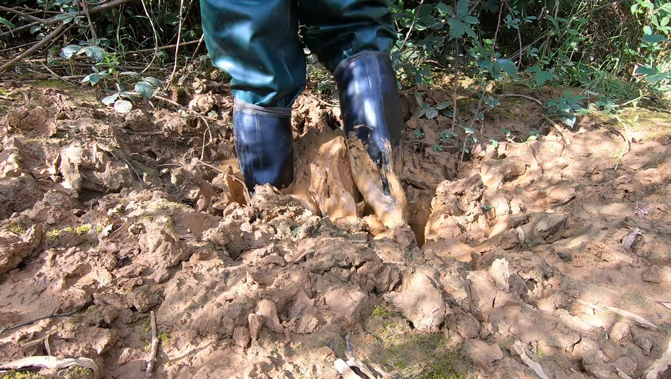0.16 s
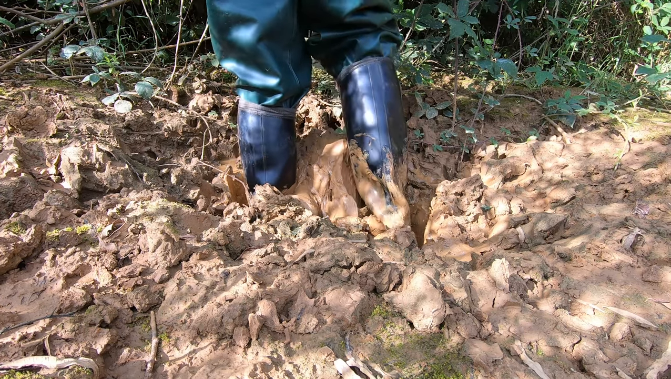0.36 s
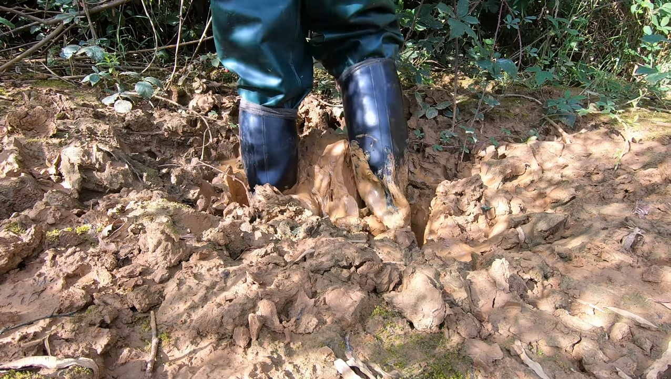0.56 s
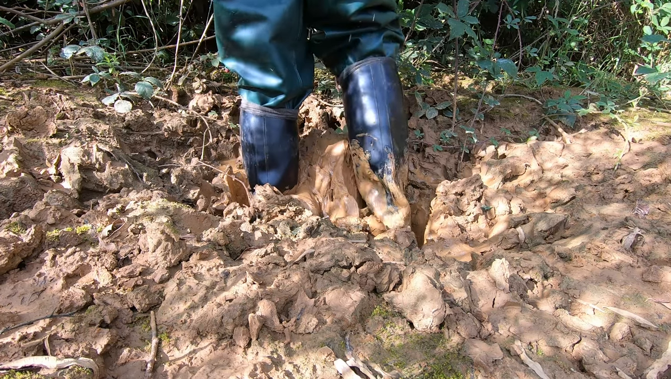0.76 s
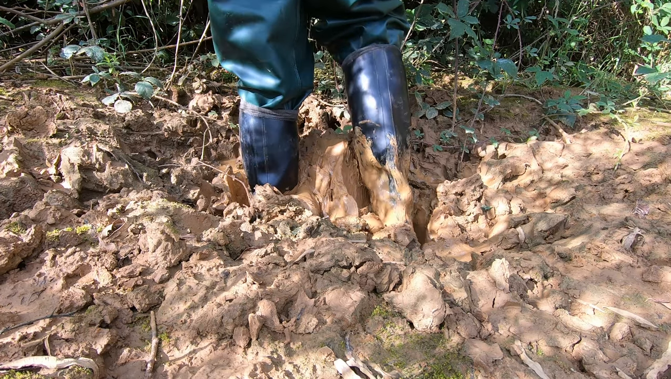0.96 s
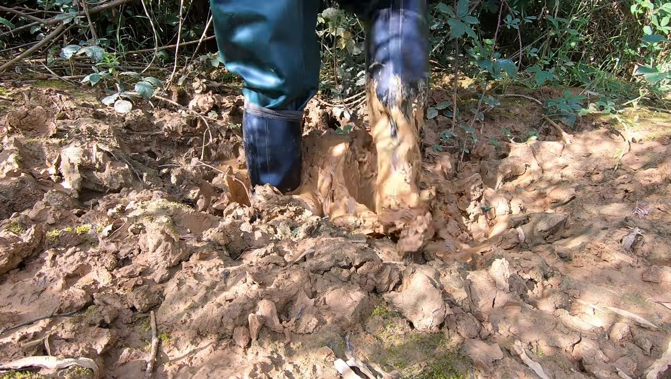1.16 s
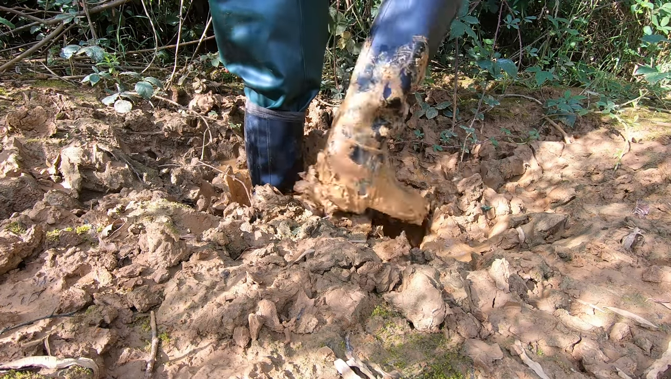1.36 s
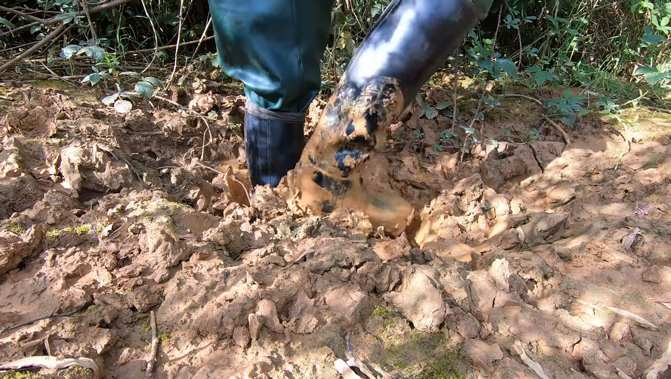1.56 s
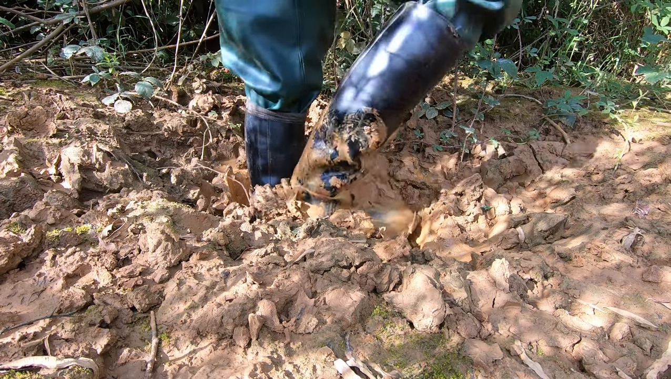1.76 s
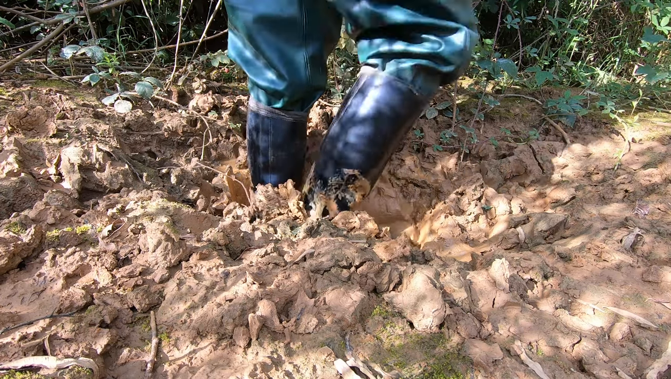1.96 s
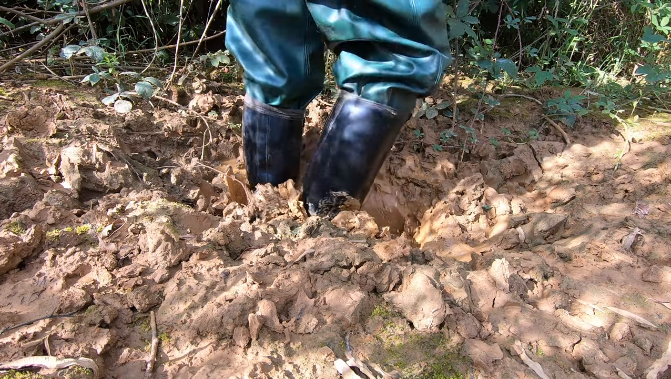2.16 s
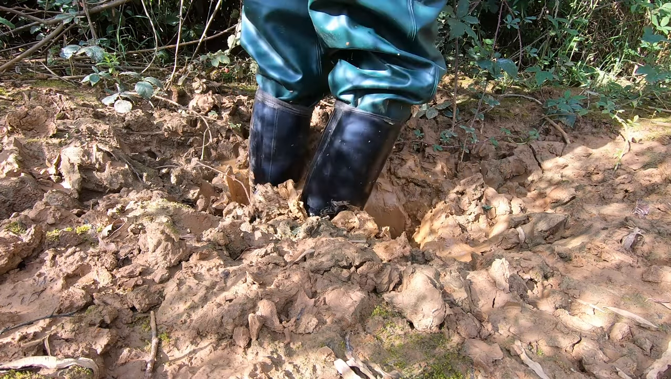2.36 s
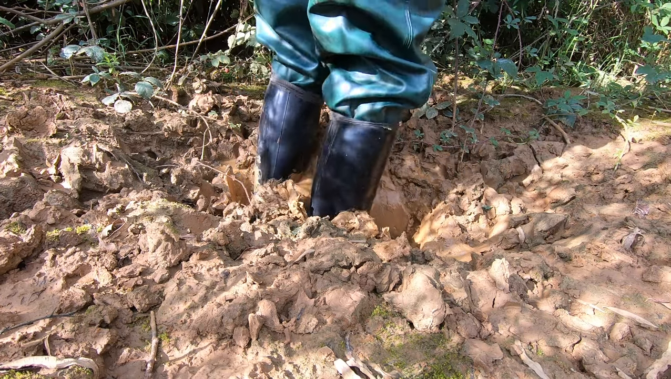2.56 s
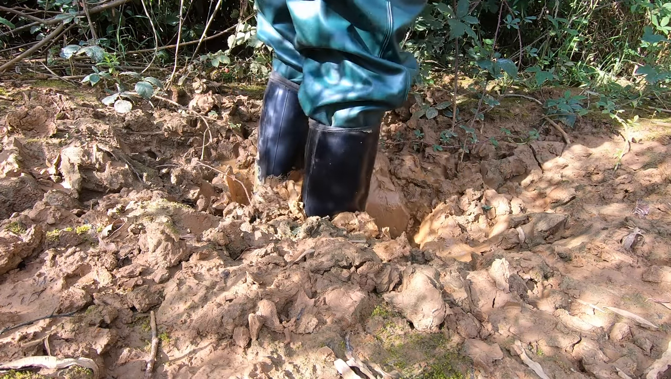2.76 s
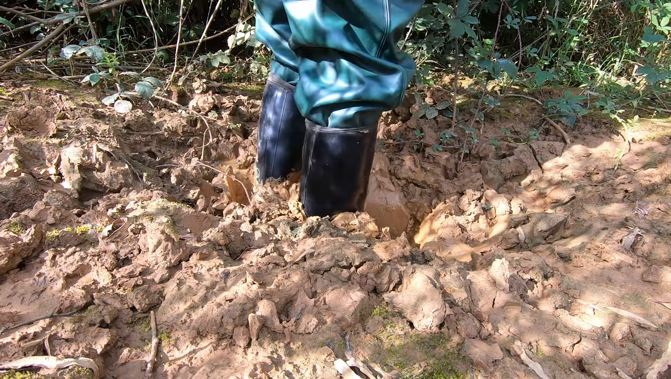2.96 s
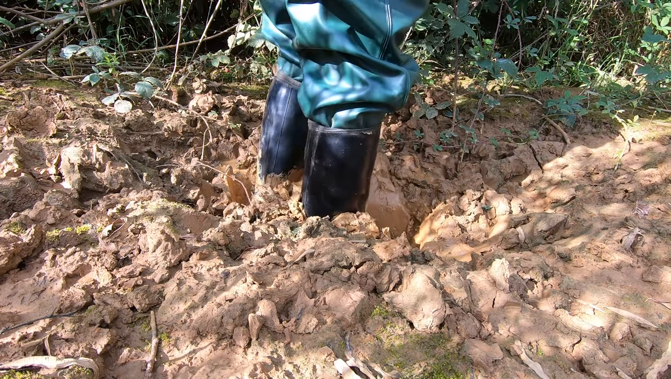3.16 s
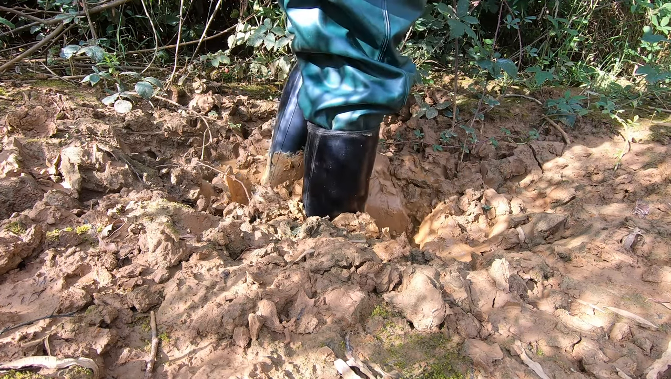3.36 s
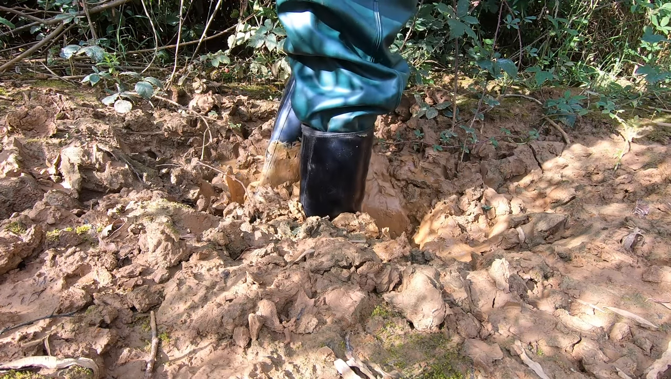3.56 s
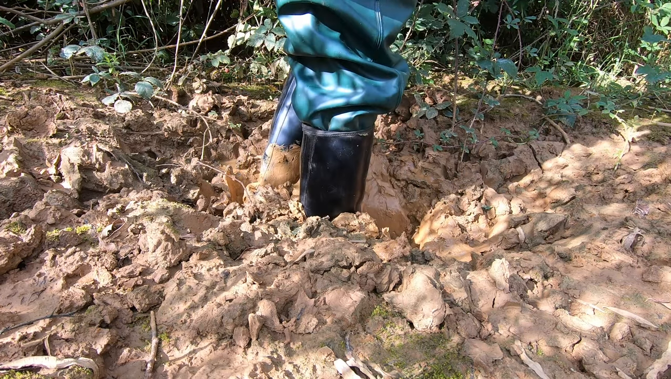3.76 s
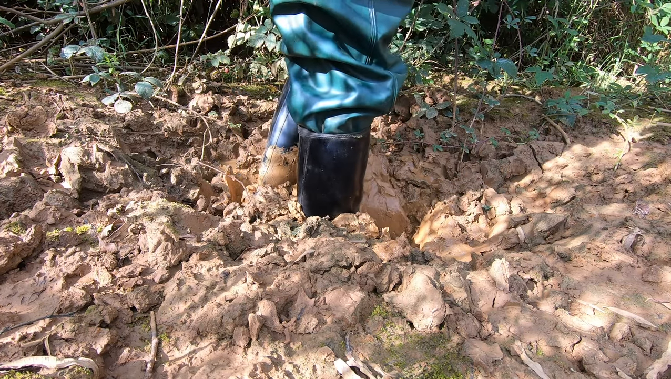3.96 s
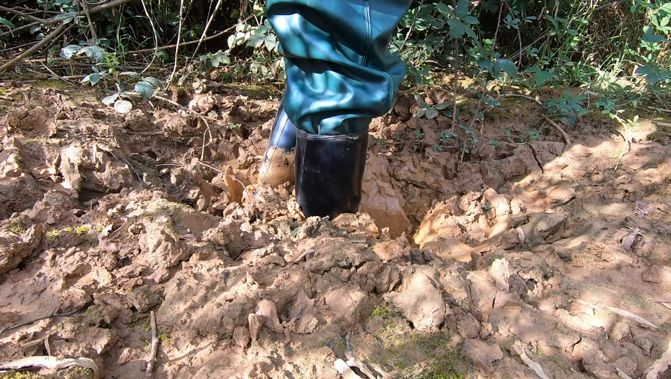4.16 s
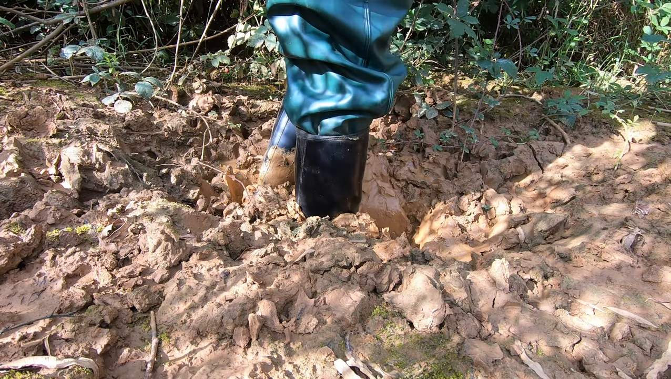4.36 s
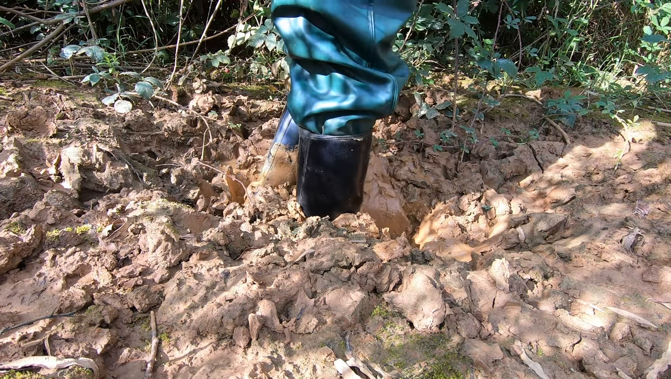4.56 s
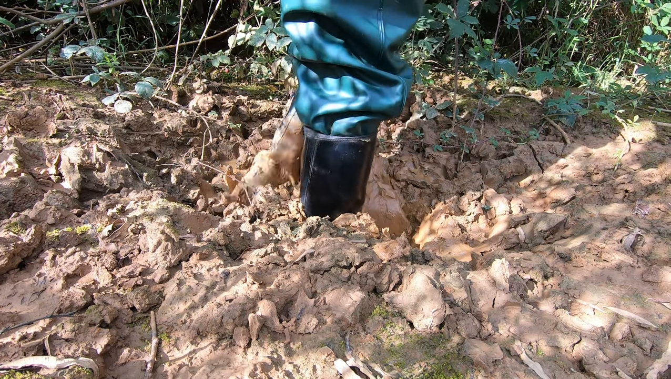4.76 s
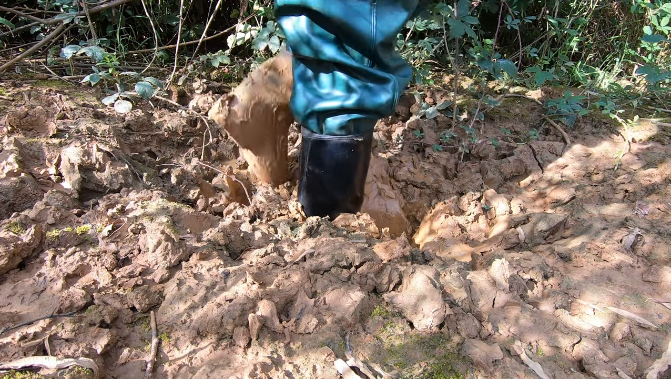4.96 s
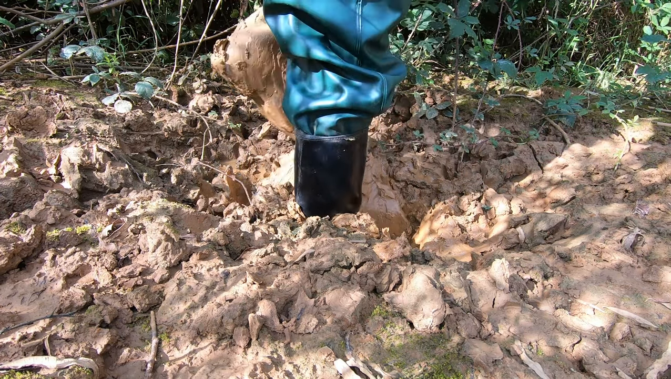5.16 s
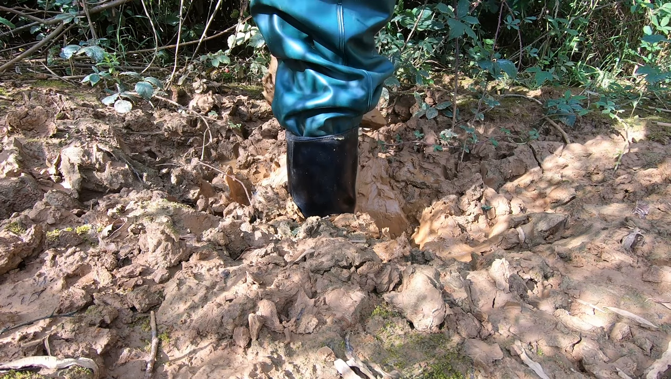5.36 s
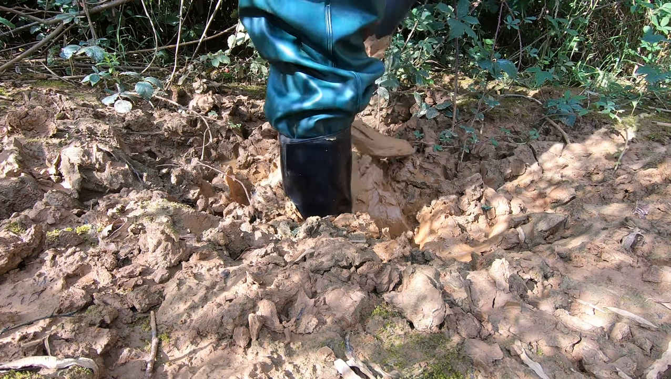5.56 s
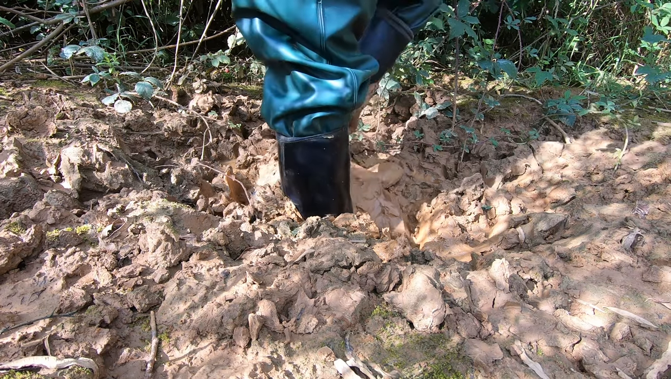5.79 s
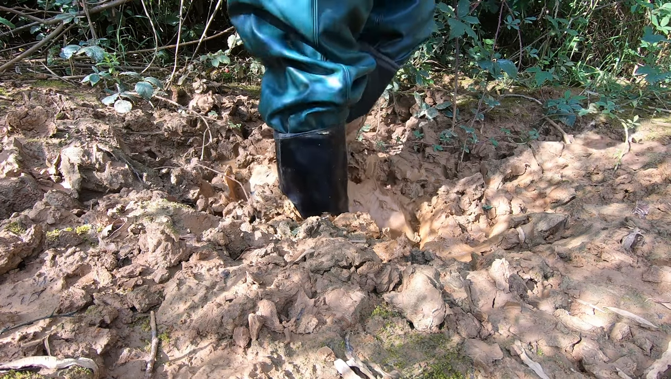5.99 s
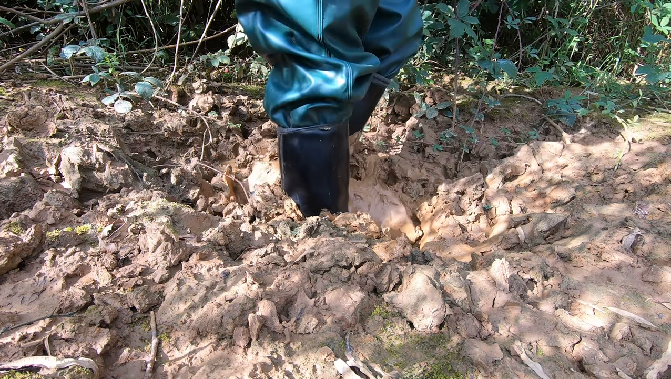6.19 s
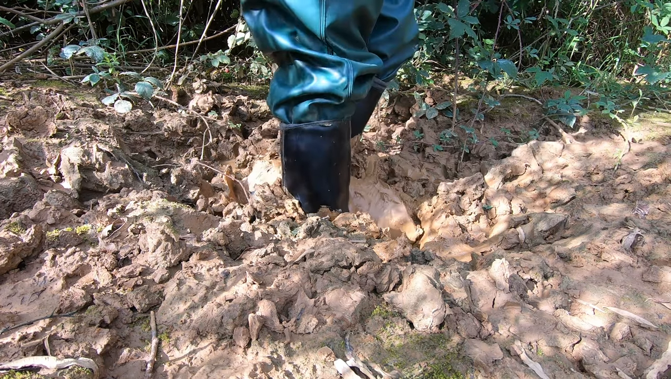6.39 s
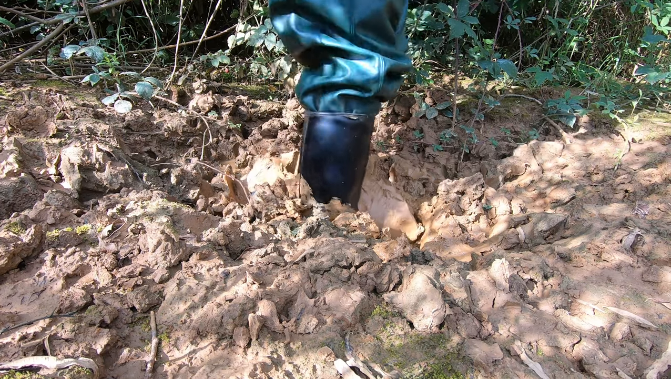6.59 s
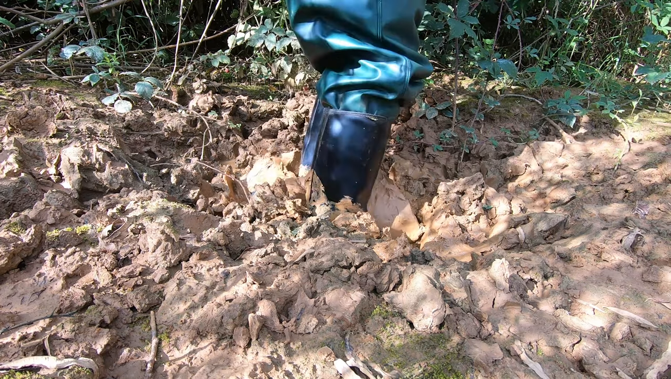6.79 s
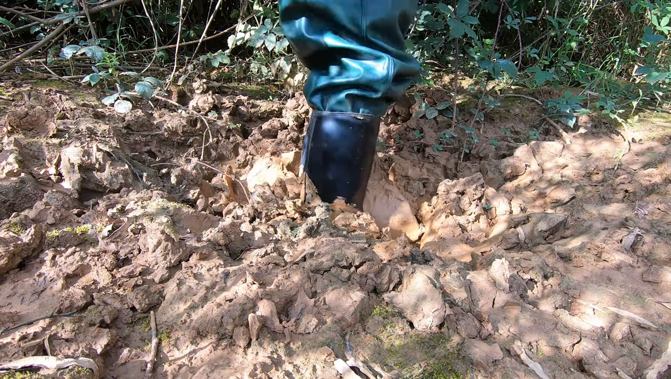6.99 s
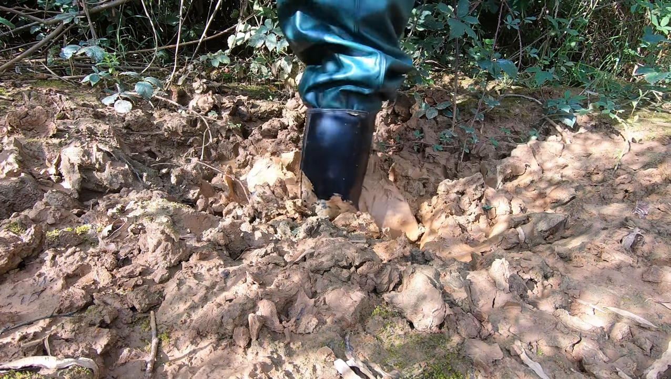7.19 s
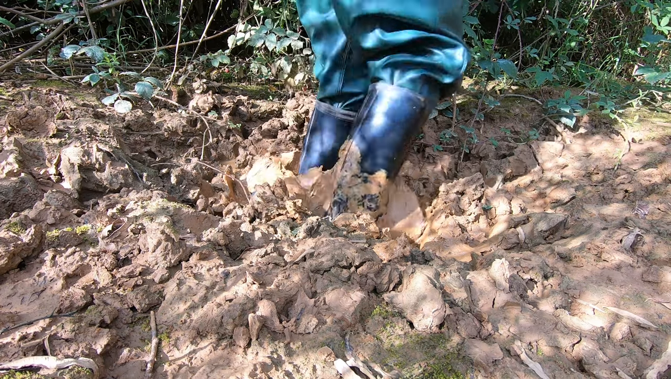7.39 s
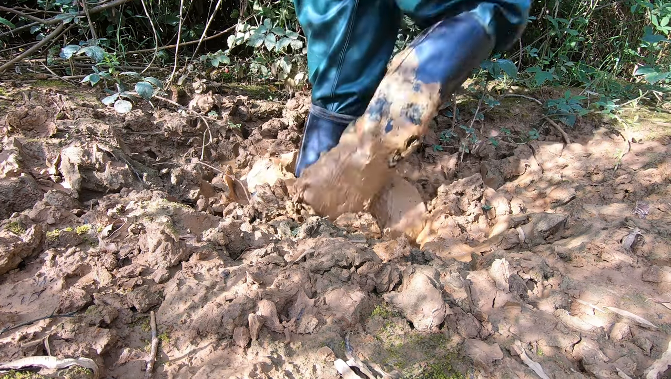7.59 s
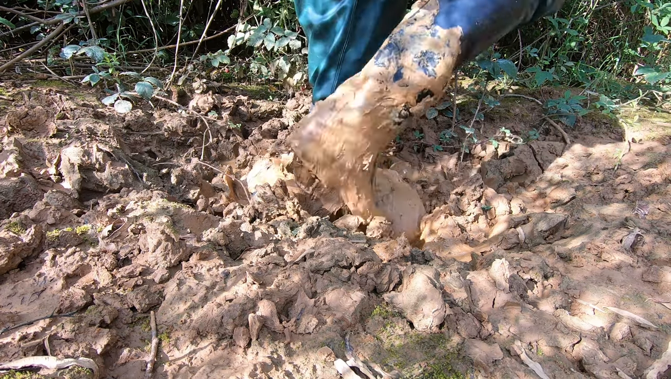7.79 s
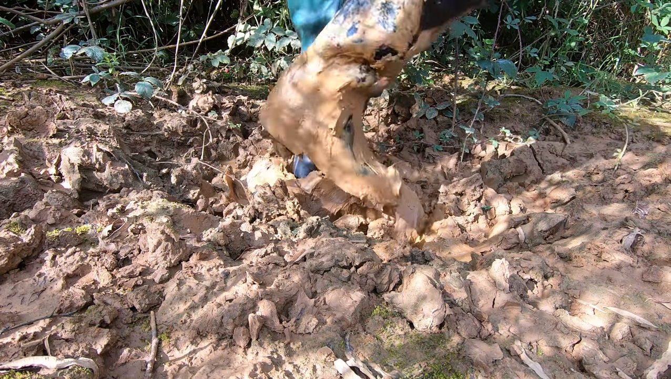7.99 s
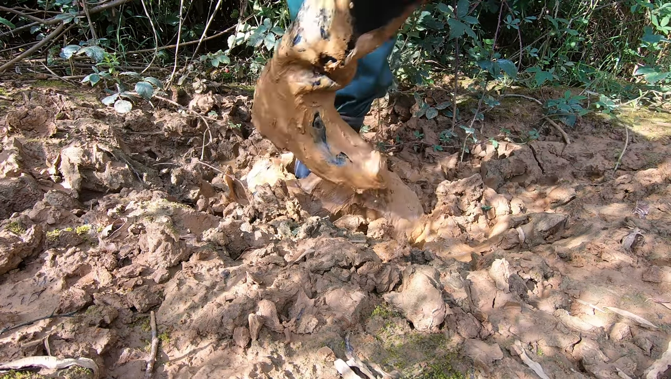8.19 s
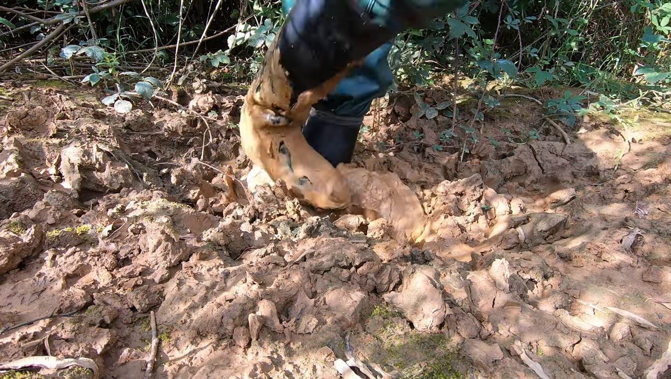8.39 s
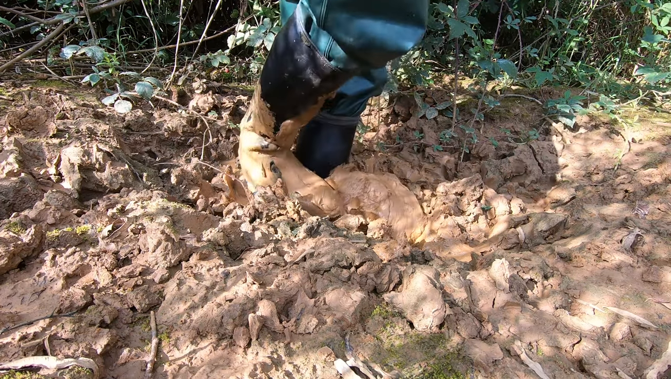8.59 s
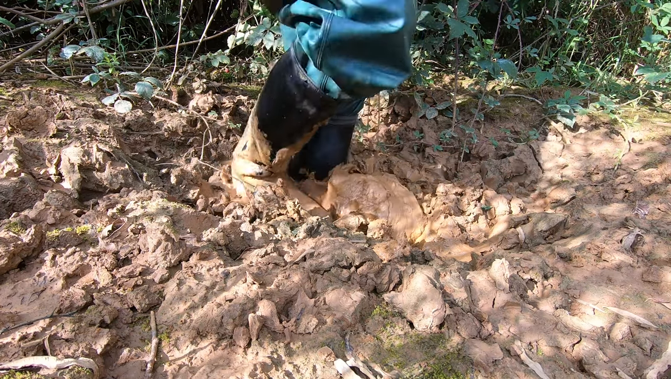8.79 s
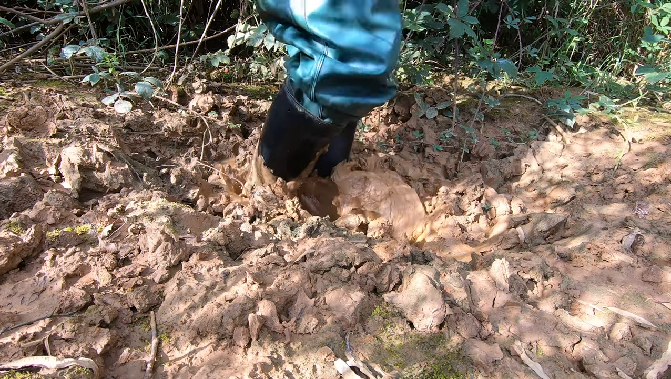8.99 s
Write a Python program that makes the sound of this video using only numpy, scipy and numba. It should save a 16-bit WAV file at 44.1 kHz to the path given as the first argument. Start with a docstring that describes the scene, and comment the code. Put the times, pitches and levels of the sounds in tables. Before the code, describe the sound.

Rubber boots tread in deep sticky clay, heard close, dry and in stereo outdoors over a very faint soft hush. It opens mid-squelch with a loud hollow burp and gurgle, then sticky pops near 0.4-0.6 s and a wet smack at 0.9 s. Thin hissing seep follows until 1.7 s, when a dense slurp of bubbling pops begins; at 2.0 s there is a strong suck and soft low thud, then fizzing, gurgling and rapid popping to 2.7 s. A short squelch comes at 3.3 s, with quiet clicks and a barely audible rubber creak at 4 s. Another gurgling squelch arrives at 4.6 s, then sparse ticks and crackly pops around 5.5-6 s and 6.6 s. The loudest suction pop bursts at 7.4 s, followed by a slurp and low thud. Near quiet until small bubbles at 8.5-8.9 s and a final wet smack at 9 s.

```python
"""Rubber boots in sticky clay

Rubber boots sink into deep clay and pull free, heard up close outdoors.
Puffs of air sucked past the boot ring the hollow it leaves, hiss in the slit and fizz in small bubbles.
Clay films pop with the note of their air pocket; big pockets gurgle and smaller ones burp.
Rubber creaks in jerks, the foot thuds down as a low fading tone, and filtered noise makes a faint hush."""
import sys
import numpy as np
from scipy import signal
from scipy.fft import rfft, irfft, next_fast_len
from scipy.io import wavfile
from scipy.ndimage import uniform_filter1d, map_coordinates
from numba import njit

SR = 44100
rng = np.random.default_rng(int(sys.argv[2]) if len(sys.argv) > 2 else 0)


def wrap_up_sound(samples):
    """Save the sound to the file named by the first command line argument, as 16-bit audio."""
    columns = np.atleast_2d(samples).T
    # keep every value between -1 and 1, then stretch to whole-number steps
    tamed = np.clip(columns, -1, 1)
    steps = np.round(tamed * 32767).astype(np.int16)
    wavfile.write(sys.argv[1], SR, steps)


N = 398663

# Each pull or push draws air past the boot; slit and fizz levels are relative to the hollow:
# start_s (at full strength), rise_s, hold_s, fall_s, hollow_db, slit_db, fizz_db
PULLS = [(0, .01, 0.0064, 0.12, -22, -9, -13), (.06, 0.053, 0.073, 0.052, -41, 4, -2),
         (.282, 0.02, 0.011, 0.04, -47, -3, -9), (.33, .03, .01, .06, -47.5, 0, -7),
         (.43, 0.053, 0.012, 0.16, -54, 4.5, -6), (.59, 0.0058, 0.0029, 0.025, -43.5, -24, -30),
         (.895, 0.009, 0.019, 0.062, -32, 0, -6.5), (1.1, 0.22, 0.29, 0.36, -49, 3, -4.5),
         (1.725, 0.029, 0.13, 0.044, -41.5, 3.5, -11), (1.975, 0.012, 0.0084, 0.046, -26.5, -0.5, -2),
         (2.04, 0.11, 0.024, 0.14, -41.5, 10, 4), (2.21, 0.046, 0.038, .05, -53.5, 8.5, -21),
         (2.28, 0.0096, 0.064, 0.072, -34, 3.5, 1), (2.42, 0.09, 0.14, 0.041, -33.5, -5.5, -15),
         (2.65, 0.097, 0.01, 0.11, -44.5, -2, -8), (2.75, 0.15, 0.13, 0.054, -51, -2, -11),
         (3.04, 0.21, 0.079, 0.72, -63, 7, 0.5), (3.325, 0.041, 0.046, 0.038, -35.5, -4, -3),
         (3.51, 0.13, 0.022, 0.17, -52.5, -2, -18), (4.01, 0.031, .12, 0.069, -59, -7, -15),
         (4.575, 0.02, 0.031, .1, -43, -3.5, -11), (4.645, 0.024, 0.11, 0.051, -35, 2.5, -5.5),
         (4.82, 0.074, 0.037, 1, -56.5, 1, -1.5), (5.06, 0.13, 0.068, 0.095, -57.5, 6.5, -1.5),
         (5.2, 0.082, 0.092, 0.059, -56.5, -2.5, -6.5), (5.65, 0.44, 0.018, 0.13, -60, 6.5, 5.5),
         (5.74, 0.051, 0.037, 0.15, -48, 3.5, -10), (5.88, 0.11, 0.081, 0.11, -48.5, 5.5, 1),
         (6.03, 0.18, 0.12, 0.43, -50, 0, -6.5), (6.62, 0.4, 0.08, 0.17, -48.5, 1, -8),
         (6.95, 0.062, 0.02, 0.058, -58, 0, -20), (7.06, 0.23, 0.039, 0.17, -60.5, 1.5, -7),
         (7.29, 0.098, 0.057, 0.1, -46.5, 4.5, -2.5), (7.38, 0.014, 0.012, 0.023, -27, 3, -9),
         (7.48, 0.045, 0.013, 0.091, -24.5, -5, -10), (7.62, 0.38, 0.38, 0.2, -52, 1.5, -8),
         (8.5, 0.43, 0.039, 0.074, -60.5, 2.5, -1), (8.74, 0.17, 0.047, 0.051, -55, 9.5, 2.5),
         (8.84, 0.048, 0.07, 0.026, -52, 2, -2), (8.97, 0.039, 0.0092, 0.14, -35.5, 4, 4.5)]
# Tone colour of the fizzing spray: pitch_hz, level_db
FIZZ_COLOUR = [(1760, -36), (3000, -2.5), (4060, -11), (4380, -11), (5160, -6.5), (6390, 1), (10400, -14),
               (15500, -41.5)]
# Big air pockets wallowing; the deep level is relative to the other:
# start_s (at full strength), rise_s, hold_s, fall_s, level_db, deep_db
GURGLES = [(0, .01, 0.15, 0.048, -35.5, -5.5), (.315, 0.051, 0.024, 0.074, -41, -0.5),
           (.41, 0.067, 0.038, 0.055, -44, -0.5), (.9, 0.016, 0.028, 0.16, -30.5, -11),
           (.97, 0.035, 0.058, 0.031, -48, 14.5), (1.16, 0.077, 0.14, 0.31, -50, -14),
           (1.74, 0.052, 0.087, 0.096, -46, -31), (1.97, 0.024, 0.013, 0.18, -40.5, -4),
           (2.27, 0.086, 0.3, 0.058, -39.5, -13.5), (2.65, 0.074, 0.027, 0.27, -43, -17),
           (3.3, 0.017, 0.072, 0.013, -33.5, -6), (3.5, .05, 0.048, 0.13, -60, -15),
           (4.03, 0.089, 0.054, 0.076, -66, -19), (4.65, 0.06, 0.08, 0.096, -36.5, -5),
           (4.95, 0.24, 0.23, 0.46, -56, -19), (5.75, 0.36, 0.44, 0.41, -55.5, -25),
           (6.6, 0.28, 0.12, 0.14, -44.5, -24), (6.93, 0.022, 0.068, 0.029, -53.5, -19),
           (7.28, 0.049, 0.075, .1, -38.5, -33), (7.38, 0.015, 0.0074, 0.028, -29.5, -0.5),
           (7.49, 0.11, 0.019, .13, -32.5, -4), (7.7, .1, .35, 0.1, -57, -23),
           (8.75, 0.082, 0.014, 0.079, -51, -21), (8.98, 0.042, 0.006, 0.041, -32.5, -10)]
# Single pockets burping on their own gliding note: start_s, length_s, first_hz, last_hz, level_db
BURPS = [(0, 0.021, 660, 617, -20.5), (0, 0.021, 3930, 3800, -30), (0.032, 0.033, 690, 616, -25),
         (.158, .016, 200, 190, -34), (.272, 0.034, 253, 162, -39), (.472, 0.014, 115, 115, -35),
         (.516, 0.042, 110, 177, -40), (0.902, 0.038, 890, 900, -34), (1.766, 0.041, 233, 232, -36),
         (1.832, 0.046, 230, 247, -40), (1.725, .012, 2950, 3080, -30.5), (1.966, 0.024, 580, 1250, -28),
         (1.971, 0.043, 3790, 3450, -26), (2.038, 0.043, 2120, 2250, -28.5), (2.099, .03, 2110, 1960, -43),
         (2.248, 0.038, 320, 412, -30.5), (2.266, 0.047, 940, 1160, -28.5),
         (2.281, 0.032, 1750, 2030, -26.5), (2.31, .04, 1940, 2190, -30.5), (2.446, 0.009, 990, 930, -30),
         (2.467, 0.014, 950, 900, -32), (2.499, 0.0097, 900, 890, -20.5), (2.511, 0.0088, 930, 895, -22),
         (2.541, 0.017, 880, 880, -20), (2.557, 0.0068, 880, 875, -17.5), (2.418, 0.045, 6000, 6200, -41),
         (2.64, 0.032, 420, 380, -34.5), (3.314, 0.062, 786, 970, -26.5), (3.32, 0.063, 1400, 1340, -31.5),
         (3.324, 0.043, 2780, 2700, -30), (3.333, 0.041, 3640, 3400, -32.5),
         (3.334, 0.051, 4860, 5040, -35.5), (3.285, 0.072, 198, 353, -34.5), (4.565, 0.13, 1820, 1760, -45),
         (4.574, 0.12, 4800, 4760, -47.5), (4.606, 0.076, 795, 810, -35.5), (4.643, 0.16, 5700, 5500, -44),
         (4.69, 0.033, 1690, 1600, -35), (4.695, 0.077, 2700, 2930, -36.5), (7.393, 0.012, 1410, 1420, -24),
         (7.462, 0.05, 2120, 2250, -28), (7.451, 0.024, 580, 560, -32.5), (7.48, 0.046, 513, 810, -21.5),
         (7.511, 0.028, 800, 900, -31), (7.466, 0.026, 1370, 1260, -27), (8.003, 0.063, 1110, 1420, -48),
         (8.67, 0.035, 2010, 2730, -51), (8.727, .03, 3250, 3200, -46), (8.736, 0.025, 228, 252, -41.5),
         (8.763, 0.016, 3060, 3320, -35), (8.805, 0.056, 1550, 1620, -48), (8.835, 0.09, 360, 345, -50),
         (8.866, 0.038, 1750, 1720, -51), (8.872, 0.035, 1230, 1070, -44.5),
         (8.96, 0.039, 2860, 2910, -28.5), (8.967, 0.022, 770, 880, -29.5),
         (9.006, .033, 2200, 2290, -33.5)]
# Larger clay films bursting; the crack level is relative to the pop: start_s, level_db, pitch_hz, crack_db
POPS = [(.287, -33.5, 2880, -19), (.431, -24, 2970, -27), (.446, -19.5, 2540, -30), (.447, -27.5, 736, -24),
        (.46, -23, 3050, -27), (.585, -26.5, 1015, -30), (.586, -20, 2264, -40), (.886, -24.5, 910, 8.5),
        (.964, -35, 10400, -20), (1.007, -32, 7940, -20), (1.177, -32, 10700, -12), (1.178, -23, 2630, -27),
        (1.288, -31.5, 7660, -3), (1.347, -33, 6760, -8), (1.251, -23.5, 1450, -27),
        (1.256, -23.5, 1450, -27), (1.593, -25, 498, -10), (1.718, -26, 1156, -14),
        (1.731, -13.5, 4090, -11), (1.732, -15.5, 1350, -27), (1.745, -13, 1660, -30),
        (1.751, -16, 2170, -25), (1.757, -16, 1900, -30), (1.763, -16, 2110, -25), (1.781, -17, 1400, -20),
        (1.797, -23, 1870, -14), (1.807, -26, 1600, -27), (1.768, -10.5, 2130, -32),
        (1.769, -21, 4200, -13), (1.787, -13, 1490, -19), (1.787, -19, 3280, -18), (1.817, -20, 1517, -12),
        (1.817, -28, 3500, -14), (1.829, -18, 1300, -18), (1.841, -18, 2210, -9.5), (1.855, -24, 1400, -5),
        (2.136, -31, 3470, -8), (2.147, -19.5, 966, -4), (2.167, -25.5, 3500, -2), (2.187, -20, 1490, -12),
        (2.271, -8.5, 1070, -19), (2.444, -13, 920, -18), (2.609, -20, 494, -32), (2.872, -34, 745, -26),
        (3.02, -29.5, 5500, -30), (3.27, -36, 6140, -7), (3.316, -15, 844, -26), (3.336, -13, 860, -23),
        (3.443, -20, 3670, -31), (3.461, -35, 4100, -10), (3.481, -32.5, 2600, -22),
        (3.637, -32.5, 2430, -24), (4.57, -28.5, 810, -13), (4.572, -34, 1910, -20),
        (4.582, -26.5, 1920, -10), (4.797, -29.5, 397, -14), (4.609, -22.5, 657, -22),
        (4.635, -20, 840, -22), (4.649, -15.5, 644, -10), (4.676, -15.5, 610, -22), (4.696, -19, 1700, -10),
        (4.74, -19, 2900, -6), (4.783, -20.5, 5500, -2), (5.275, -34.5, 2740, -9), (5.481, -23, 2600, -7),
        (5.711, -40, 910, 12.5), (5.743, -26.5, 1260, -10), (5.743, -21.5, 4450, -12),
        (5.757, -27, 1480, -12), (5.764, -22.5, 3360, -24), (5.775, -24, 3000, -26),
        (5.787, -33, 3270, -25), (5.804, -23, 3230, -28), (5.828, -30, 5620, -7), (5.843, -16.5, 790, -10),
        (5.87, -13, 528, -28), (5.871, -20, 2720, -9), (5.85, -25, 640, -8), (5.927, -27, 2680, -14),
        (5.95, -28, 4960, -1), (5.878, -21, 1990, -20), (5.893, -27, 2600, -12), (5.917, -19.5, 1260, -20),
        (5.933, -23, 2700, -16), (5.956, -24.5, 4070, -7), (6.074, -31, 3540, -9),
        (6.097, -25.5, 4860, -16), (6.578, -20, 1310, -15), (6.592, -25.5, 2670, -2.5),
        (6.665, -21.5, 544, -16), (6.752, -43, 4600, 13), (6.776, -35, 725, -5), (6.936, -32.5, 510, -22),
        (7.076, -35, 1210, -18), (7.293, -22, 643, -6), (7.377, -0.5, 1340, -41), (7.378, -4.5, 2390, -25),
        (7.402, -21, 4720, -12), (7.602, -14, 3140, -29), (7.629, -25, 2470, -1), (7.664, -32, 1700, -5),
        (8.492, -31.5, 3140, -11.5), (8.589, -36, 2600, -4), (8.63, -37, 1700, -2), (8.663, -30, 4370, -3),
        (8.696, -26, 2630, -21), (8.704, -24.5, 2740, -27), (8.751, -21, 3320, -18),
        (8.768, -24.5, 1460, -9), (8.789, -26.5, 5940, -4), (8.845, -30, 1740, -21),
        (8.937, -19.5, 1135, -6), (8.961, -16, 4350, -5)]
# Rubber slipping on clay: start_s, level_db, slips_per_s
CREAK = [(3.985, -90, 0), (3.998, -63, 66), (4.09, -59, 63), (4.13, -56, 50), (4.17, -72, 40),
         (4.2, -90, 0)]
# Soft ground taking weight; the last column is the time to fade by 60 dB: start_s, level_db, pitch_hz, fade_s
THUDS = [(2.029, -35, 53.2, 0.73), (7.484, -27.5, 53.6, 0.44)]
# Tone colour of the outdoor hush: pitch_hz, level_db
HUSH_COLOUR = [(15, -45), (25, -15), (93, -15), (142, -2), (186, 0), (529, -6), (1240, -6), (2780, -8),
               (4260, -15), (7480, -19), (10300, -32), (12800, -55), (15000, -63)]
# How alike left and right are in the hush: pitch_hz, likeness (1 same, 0 unrelated, -1 opposite)
HUSH_ALIKE = [(60, 1), (240, 0.7), (950, -0.34), (3770, 0.51), (15000, -0.53)]
# The same for the sucking and gurgling: pitch_hz, likeness
NEAR_ALIKE = [(40, 0.15), (110, 1), (350, 1), (700, 0.43), (2000, 0.67), (5000, 1), (9000, 0.33)]
# Where the working boot stands: start_s, left_minus_right_db
PLACE = [(0, 1.5), (1.1, 3), (2.3, 2), (3.3, 3.5), (4.4, 3), (5.6, 3), (6.6, 3), (7.8, 2.5), (9.04, 2.5)]
# How far the left microphone port leads the right: pitch_hz, lead_radians
PORT_LEAD = [(60, -0.32), (300, -0.28), (860, 0.98), (2070, -0.48), (6980, 1), (15200, 1)]
# How much louder the left port is: pitch_hz, left_minus_right_db
PORT_LEAN = [(60, -2), (180, -4.5), (550, -5), (1650, -0.5), (4970, -2.5), (15000, -4)]

TOP_HZ = 15700  # nothing is kept from here up
SLOPE_DB = 20  # rise and fall times are the time taken to gain or lose this much
# Air seeping while the boots stand: hollow, then slit and fizz relative to it
REST_DB, REST_SLIT_DB, REST_FIZZ_DB = -69, -4, -1
SEEP_DB = -69  # big pockets at rest
# Unevenness of fizz and of drawn air; how slowly a fizz bubble dies, in cycles of its note
FIZZ_PATCHY_DB, AIR_PATCHY_DB, FIZZ_TURNS = 2.5, 3.5, 9
TOP_FLICKER_DB = 3  # coming and going of the finest spray
CLEAN_HZ, CLEAN_ROUGH = 300, .8  # burps starting below this pitch are a smooth tone plus this much rough air
# Ring time of a 1500 Hz pocket (60 dB fade); how strongly higher pockets die sooner; size of the first snap
POP_FADE_S, POP_SMALLER, BURST = 0.024, 0.22, 0.65
DRIP_DB, DRIP_FADE_S, DRIP_SHARPNESS = -26, .07, 1.2  # the broad wet trail after a burst
NEIGHBOUR, NEIGHBOUR_DB = 1.6, -13  # a smaller pocket rings too: usual pitch ratio, level relative to the pop
# Small films: rate, level above the drawn air, scatter, middle pitch, range of pitch (20 dB is ten times)
TICKS_PER_S, TICK_DB, TICK_SPREAD_DB, TICK_HZ, TICK_RANGE_DB = 22, 5, 3, 2200, 14
CREAK_START = .57  # share of a slip's strain already built up at the start


def suction():
    """Puffs of drawn air ring the hollow under the boot, hiss in the slit beside it and fizz."""
    hollow_db, slit_db, fizz_db = draught()
    # a gentle slide is smooth, a hard pull flutters and puffs
    effort = np.clip((hollow_db + 55) / 25, 0, 1)
    lip = even(flutter(rate=170, depth=2 * effort))

    drawn = puffs(rate=84, depth_db=2.0 + 0.33 * effort, patchy_db=AIR_PATCHY_DB)
    air = unit(lip * drawn) + amp(-11.5) * bubbles(rate=500, top_hz=2227, turns=2.74)
    drift = amp(wobble(12))  # both air spaces change size a little as the boot moves
    hollow = cavity(air, 520 * drift, sharpness=0.21)
    slit = cavity(air, (1900 + 500 * effort) * drift, sharpness=0.4)
    # clay walls damp both ends
    low = unit(filtered(hollow, lambda hz: keep_below(hz, 1400, 4) * keep_above(hz, 260, 4)))
    high = unit(filtered(slit, lambda hz: keep_below(hz, 3800, 4) * keep_above(hz, 1100, 4)))

    mist = puffs(rate=76, depth_db=1.5 + 1.0 * effort, patchy_db=FIZZ_PATCHY_DB)
    spray = unit(lip * mist) + amp(-3.5) * bubbles(rate=180, top_hz=5630, turns=FIZZ_TURNS)
    fizz = unit(filtered(spray, lambda hz: amp(along(FIZZ_COLOUR, hz))))
    finest = filtered(fizz, lambda hz: keep_above(hz, 7500, 6))
    # the finest spray comes and goes by itself
    fizz = fizz + (amp(TOP_FLICKER_DB * wobble(10)) - 1) * finest
    return amp(hollow_db) * low + amp(slit_db) * high + amp(fizz_db) * fizz


def draught():
    """Each pull swells the drawn air: levels of the hollow, the slit and the fizz in dB."""
    return swells(PULLS, [REST_DB, REST_DB + REST_SLIT_DB, REST_DB + REST_FIZZ_DB])


def flutter(rate, depth):
    """A clay lip slaps open at an uneven rate and lets the air through in pulses."""
    cycle = np.cumsum(rate * amp(3.0 * wobble(30))) / SR % 1
    return np.exp(-depth * cycle)


def puffs(rate, depth_db, patchy_db):
    """Turbulent air in uneven puffs; many passing gaps favour now one narrow band, now another."""
    bands = signal.stft(rng.standard_normal((2, N)), nperseg=512)[2]
    patches = rng.standard_normal(bands.shape[1:])
    patches = uniform_filter1d(patches, size=2, axis=0)  # across pitch
    patches = uniform_filter1d(patches, size=12, axis=1)  # across time
    air = signal.istft(bands * amp(patchy_db * unit(patches)), nperseg=512)[1][:, :N]
    return unit(even(amp(depth_db * wobble(rate))) * air)


def bubbles(rate, top_hz, turns):
    """Small trapped bubbles of scattered size, each ringing a few cycles at or below the top pitch."""
    when, size, loud, side = rng.random((int(rate * N / SR), 4)).T[..., None]
    t = np.arange(256) / SR
    hz = top_hz * amp(18.28 * (size - 1.0))
    strength = amp(-2.5 * np.log(loud + 0.0049))
    grain = strength * np.exp(-t * hz / turns) * np.sin(2 * np.pi * hz * t)
    at = ((when * N).astype(int) + np.arange(256)).ravel()
    # the second signal weights each bubble at random, for the stereo spread
    layers = [np.bincount(at, (weight * grain).ravel(), N + 256)[:N] for weight in (1, side - .5)]
    return unit(np.array(layers))


def gurgle():
    """Large pockets of air wallow a few cycles at a time, with a second, deeper set below them."""
    db, deep_db = swells(GURGLES, [SEEP_DB, SEEP_DB - 28])
    air = puffs(rate=35, depth_db=3.0, patchy_db=0.5)
    pocket_hz = 190 * amp(2.04 * wobble(25))
    deep_hz = 85 * amp(2.43 * wobble(7.6))
    pockets = cavity(cavity(air, pocket_hz, sharpness=1.5), pocket_hz, sharpness=0.8)
    deep = cavity(cavity(air, deep_hz, sharpness=1.7), deep_hz, sharpness=1.6)
    pockets = filtered(pockets, lambda hz: keep_above(hz, 115, 6))  # too small to sound lower
    deep = filtered(deep, lambda hz: keep_above(hz, 48, 4))
    return amp(db) * even(pockets) + amp(deep_db) * even(deep)


def burps():
    """Fluttering air sounds the note of one pocket while its size changes."""
    out = np.zeros(N + SR)
    air = flutter(rate=140, depth=1.2) * rng.standard_normal(N)
    for start_s, length_s, first_hz, last_hz, db in BURPS:
        k = np.arange(round(start_s * SR), round((start_s + length_s) * SR))
        u = np.linspace(0, 1, len(k))
        hz = first_hz + (last_hz - first_hz) * u
        sharp = 5.5 * (first_hz / 1000) ** 0.33  # higher notes are narrower for their pitch
        note = cavity(cavity(air[None, k], hz, sharpness=sharp), hz, sharpness=sharp)[0]
        if first_hz < CLEAN_HZ:
            note = np.sin(2 * np.pi * np.cumsum(hz) / SR) + CLEAN_ROUGH * unit(note)
        shape = np.sin(np.pi * u ** 0.83) ** 0.35
        out[k] += amp(db) * shape * unit(note)
    return out[:N]


def pops():
    """A film bursts in a few cycles of its pocket's note, then a wet splat and a bright crack die away."""
    out = np.zeros(N + SR)
    t = np.arange(SR // 16) / SR
    films = POPS + ticks()
    chance = rng.standard_normal((len(films), 2))
    rise = 1 - np.exp(-(t / .001) ** 3)
    for (start_s, db, hz, crack_db), (neighbour_luck, crack_luck) in zip(films, chance):
        since_snap = t - .0015
        snap = np.exp(-(since_snap * (hz / 1000) ** .7 * 1400) ** 2)
        burst = snap * np.cos(2 * np.pi * hz * since_snap)

        neighbour_hz = NEIGHBOUR * amp(neighbour_luck) * hz
        tone = .4 * np.sin(2 * np.pi * hz * t) + amp(NEIGHBOUR_DB) * np.sin(2 * np.pi * neighbour_hz * t)
        noise = rng.standard_normal((2, len(t)))
        pocket_hz = hz + 0 * t
        splat = 0.3 * cavity(noise[:1], pocket_hz, sharpness=3.5)[0]
        fade = amp(-60 * t / POP_FADE_S * (hz / 1500) ** POP_SMALLER)

        drip = amp(DRIP_DB - 60 * t / DRIP_FADE_S) * cavity(noise[:1], pocket_hz, DRIP_SHARPNESS)[0]
        crack_hz = 5200 * amp(3.0 * crack_luck) + 0 * t
        crack = cavity(cavity(noise[1:], crack_hz, sharpness=1.2), crack_hz, sharpness=1.2)[0]
        crack = amp(crack_db - 60 * t / 0.013) * crack
        pop = BURST * burst + rise * (fade * (tone + splat) + drip + crack)
        out[round(start_s * SR):][:len(t)] += amp(db) * pop
    return filtered(out[:N], lambda hz: keep_below(hz, 10500, 6) * keep_above(hz, 200, 4))


def ticks():
    """Small films burst at random, louder where more air is drawn, up to a limit; rows as in POPS."""
    when, size, pocket = rng.random((round(TICKS_PER_S * N / SR), 3)).T
    slit_db = draught()[1][(when * N).astype(int)]
    db = np.minimum(slit_db, -45) + TICK_DB - TICK_SPREAD_DB * np.log(size + .05)
    hz = TICK_HZ * amp(TICK_RANGE_DB * (pocket - .5))
    return list(zip(when * N / SR, db, hz, -28 + 0 * db))


def creak():
    """The boot shaft slips in uneven jerks; each jerk knocks the rubber's two resonances."""
    db, rate = curves(CREAK)
    cycle = np.cumsum(rate * amp(.3 * wobble(60))) / SR + CREAK_START
    jerks = np.exp(-6.5 * (cycle % 1)) * amp(1.5 * wobble(60)) * rng.standard_normal((1, N))
    low_knock = cavity(jerks, np.full(N, 480.), sharpness=2)
    high_knock = cavity(jerks, np.full(N, 1250.), sharpness=3.5)
    knocks = low_knock + 1.7 * high_knock
    return amp(db) * even(filtered(knocks[0], lambda hz: keep_below(hz, 2000, 4)))


def thuds():
    """The ground gives under the foot with a slow low swell."""
    out = np.zeros(N + SR)
    t = np.arange(SR // 2) / SR
    for start_s, db, hz, fade_s in THUDS:
        shape = amp(db - 60 * t / fade_s) * (1 - np.exp(-t / 0.024))
        out[round(start_s * SR):][:len(t)] += shape * np.sin(2 * np.pi * hz * t)
    return out[:N]


def hush():
    """Leaves and distant air: soft coloured noise, slightly unsteady."""
    noise = filtered(rng.standard_normal((2, N)), lambda hz: amp(along(HUSH_COLOUR, hz)))
    level = amp(-59.5 + wobble(1.8) + 1.8 * wobble(52))
    return level * unit(spread(noise, HUSH_ALIKE))


def cavity(x, hz, sharpness):
    """An air space of moving pitch rings with what drives it; evened for size, then set to rms 1."""
    radius = np.exp(-np.pi * hz / sharpness / SR)
    return unit(ring(x, radius, 2 * np.pi * hz / SR) * np.sqrt(1 - radius))


@njit
def ring(x, radius, angle):
    """A resonator whose pitch moves: each sample builds on the two before it."""
    y = np.zeros_like(x)
    for c in range(x.shape[0]):
        for i in range(2, x.shape[1]):
            push = x[c, i] - x[c, i - 2]
            swing = 2 * radius[i] * np.cos(angle[i]) * y[c, i - 1]
            y[c, i] = push + swing - radius[i] ** 2 * y[c, i - 2]
    return y


def swells(rows, rest):
    """Events that rise, hold and fall over a resting level; dB of each layer, per sample."""
    t = np.arange(0, N + 64, 64) / SR
    start, rise, hold, fall, db, *others = np.transpose(rows)[..., None]
    before = np.clip(start - t, 0, None) / np.abs(rise)
    after = np.clip(t - start - hold, 0, None) / np.abs(fall)
    shape = db - SLOPE_DB * (before + after)
    levels = []
    for relative_db, rest_db in zip([0, *others], rest):
        events = np.linalg.norm(amp(shape + relative_db), axis=0)  # powers add up
        level_db = 20 * np.log10(np.hypot(events, amp(rest_db)))
        levels.append(np.interp(np.arange(N) / SR, t, level_db))
    return levels


def even(gain):
    """A restless gain whose power over a tenth of a second stays near 1."""
    return gain / np.sqrt(np.abs(uniform_filter1d(gain ** 2, size=SR // 10)) + 1e-9)


def wobble(rate):
    """A smooth random curve, with rate random points a second."""
    return map_coordinates(rng.standard_normal(int(N * rate / SR) + 4), [np.arange(N) * rate / SR])


def curves(rows):
    """One value per sample for each column after the time."""
    s, *columns = np.transpose(rows)
    return [np.interp(np.arange(N) / SR, s, column) for column in columns]


def along(points, hz):
    """Read (Hz, value) points at any pitch, on a log axis."""
    f, v = np.transpose(points)
    return np.interp(np.log(hz + 1), np.log(f + 1), v)


def filtered(x, response):
    """Shape the spectrum of x by a gain for each frequency."""
    m = next_fast_len(N + SR // 2)
    return irfft(rfft(x, m) * response(np.fft.rfftfreq(m, 1 / SR)), m)[..., :N]


def keep_below(hz, edge_hz, steepness):
    """Gain that fades out above an edge."""
    return 1 / (1 + (hz / edge_hz) ** steepness)


def keep_above(hz, edge_hz, steepness):
    """Gain that fades out below an edge."""
    return 1 / (1 + (edge_hz / (hz + 1)) ** steepness)


def spread(pair, alike):
    """Two unrelated signals mixed into left and right of a given likeness."""
    def mix(hz):
        turn = np.arccos(np.clip(along(alike, hz), -1, 1)) / 2
        return np.array([np.cos(turn), np.sin(turn)])
    mid, side = filtered(pair, mix)
    return np.array([mid + side, mid - side])


def panned(db):
    """Left and right gains for a level difference."""
    return amp(np.array([db / 2, -db / 2]))


def amp(db):
    """Gain of a level in dB."""
    return 10 ** (np.asarray(db) / 20)


def unit(x):
    """x scaled to rms 1."""
    return x / np.sqrt(np.mean(x ** 2) + 1e-20)


def scene():
    """Boots in clay over the outdoor hush."""
    mud = spread(suction() + gurgle(), NEAR_ALIKE) + burps() + pops() + creak()
    boots = mud * panned(curves(PLACE)[0])
    return boots + thuds() * [[1], [.6]] + hush()  # thuds are weaker on the right


def record(dry):
    """The two microphone ports differ a little in level and phase; the highest treble is cut."""
    def ports(hz):
        phase = np.exp(.5j * np.outer([1, -1], along(PORT_LEAD, hz)))
        return panned(along(PORT_LEAN, hz)) * phase
    return filtered(dry, lambda hz: ports(hz) * (hz < TOP_HZ))


dry = scene()
out = record(dry)
wrap_up_sound(out)
```